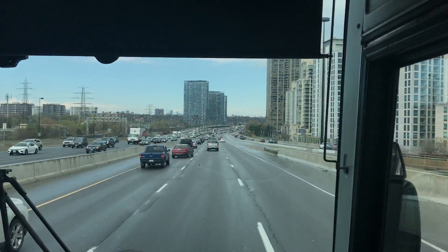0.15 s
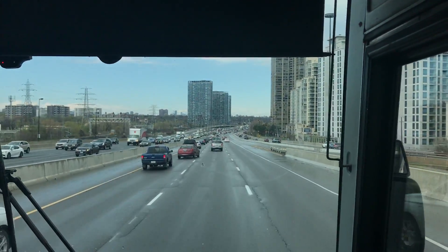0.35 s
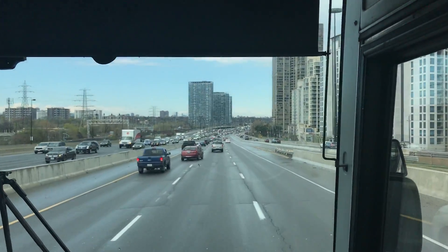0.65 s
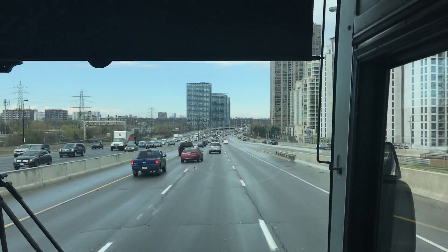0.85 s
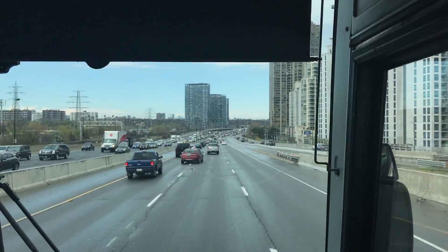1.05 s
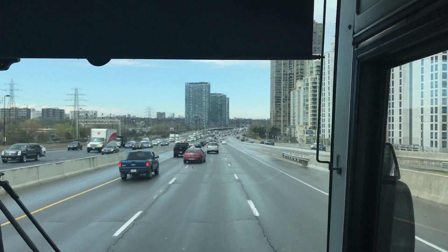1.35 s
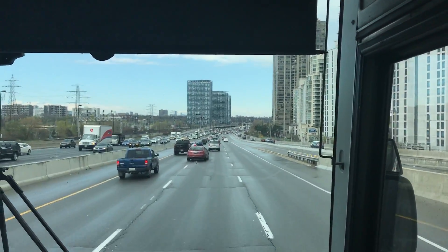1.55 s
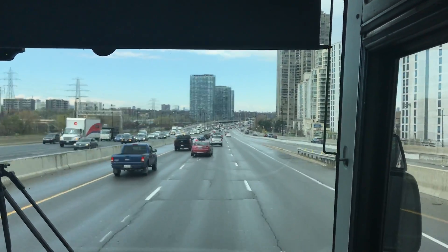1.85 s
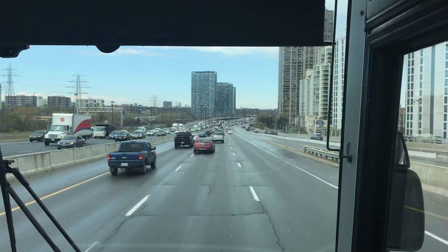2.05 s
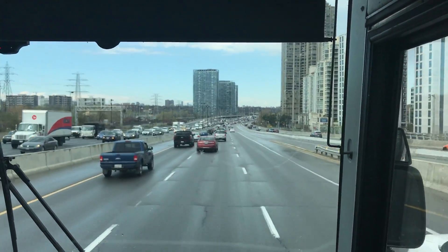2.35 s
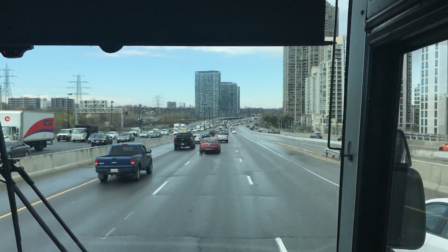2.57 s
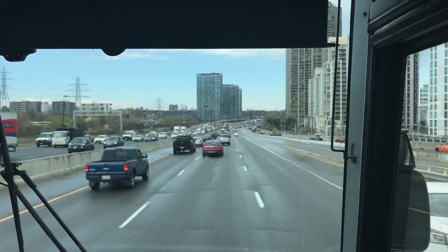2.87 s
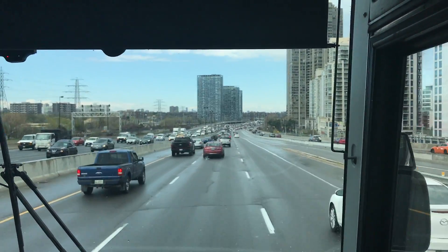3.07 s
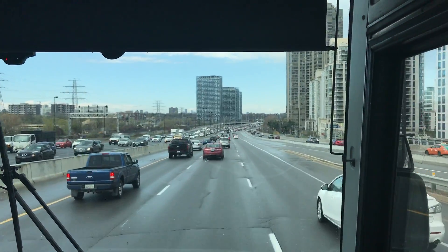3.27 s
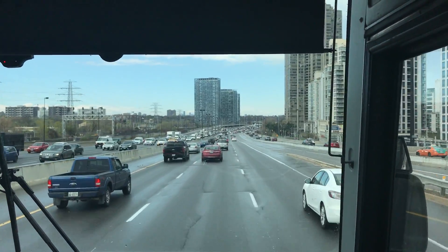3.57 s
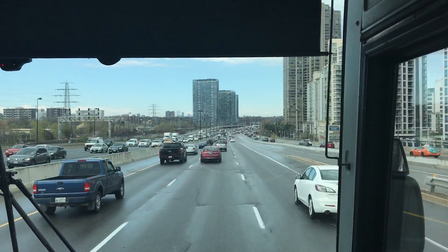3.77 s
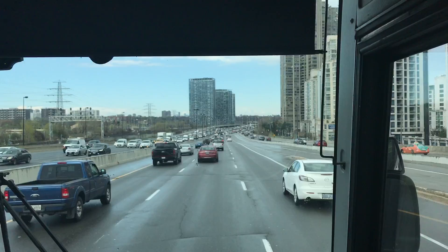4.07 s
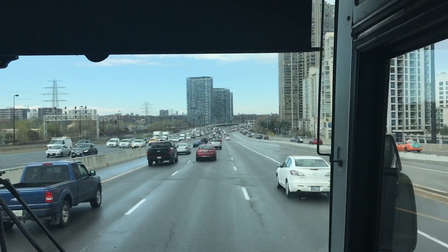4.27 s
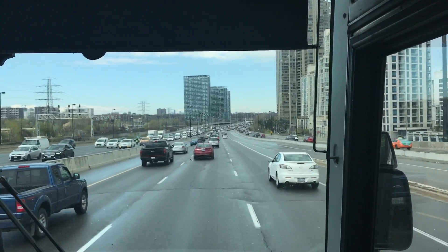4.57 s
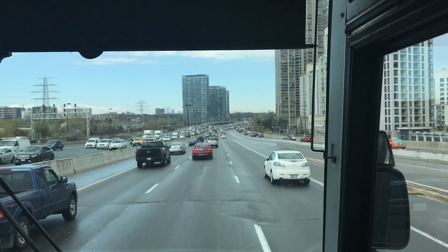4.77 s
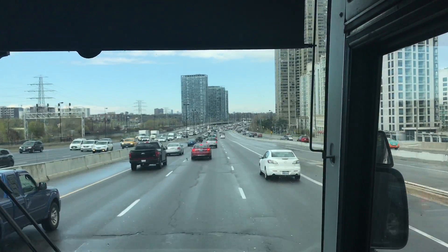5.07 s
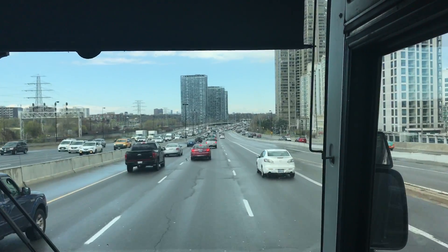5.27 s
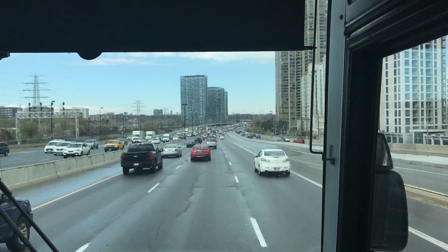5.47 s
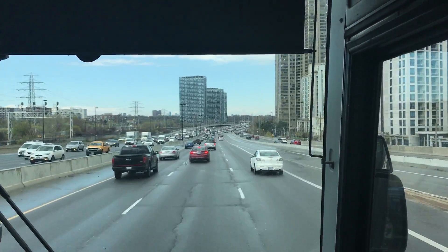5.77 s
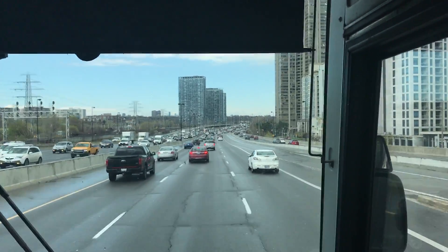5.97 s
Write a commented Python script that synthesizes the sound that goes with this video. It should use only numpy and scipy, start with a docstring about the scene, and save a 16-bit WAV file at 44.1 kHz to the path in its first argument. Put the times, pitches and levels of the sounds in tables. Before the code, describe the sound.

Inside a moving coach near the windscreen, heard through a phone microphone. A deep diesel drone wavers gently, sinking very slightly in pitch between about 2 and 3.5 seconds, beneath lumpy low cabin boom, muted tyre and wind roar and barely audible thin whines. A bump's tail opens the scene, with tiny faint chirps before 0.5. From 0.8 to 1.2 a jolt thuds and trim clatters, with dry panel knocks and piercing, very high squeaks. A second, similar flurry runs from 1.4 to 1.9. Then mostly plain rumble and light buzz, with small ticks near 2.4. At 3.0 comes a heavy deep bump with crisp knocks and a weak squeak; smaller jolts follow at 3.35 and 3.55. The ride stays smooth, with soft low swells near 4.8 and 5.4. From 5.9 a hard thud, sharp cracks, rattle and two squeaks close it, still rumbling at 6.1.

```python
"""A coach on a motorway, heard from inside, near the windscreen: its tyres and wind roar through a booming cabin.
The diesel drones in wavering sine orders beside thin whines; boom, thud and roar are shaped noise.
Boom and thud swell, strongly and faintly; trim rattles as grainy noise and panels knock as ringing bursts.
A loose fitting squeaks very high, stuttering noise ringing its modes over a short chirp.
A phone's microphone rounds the loudest peaks and cuts the extreme treble."""
import sys
import numpy as np
from scipy import signal
from scipy.fft import rfft, irfft
from scipy.io import wavfile
from scipy.ndimage import uniform_filter1d

SR = 44100
rng = np.random.default_rng(int(sys.argv[2]) if len(sys.argv) > 2 else 0)


def transcribe(u):
    """Save the signal u as a 16-bit wav file named by the first command-line argument.

    u: samples, shape (n,) or (channels, n), limited to [-1, 1]; the rate is SR.
    q: integer samples, one column per channel.
    """
    v = np.clip(np.atleast_2d(u).T, -1, 1)
    q = np.round(v * 32767).astype(np.int16)
    wavfile.write(sys.argv[1], SR, q)


N = 270333
T = np.arange(N) / SR  # s

# The diesel's course. Each row: time in seconds, pitch of the sixth order in Hz, reference level in dB.
ENGINE_COURSE = [(0, 236, -46.5), (.7, 236, -41.5), (1.4, 236, -46.5), (2.0, 234.5, -43), (2.8, 231, -44.5),
                 (3.2, 229, -55.5), (3.6, 228.3, -41.5), (4.4, 228, -42.5), (5.2, 228, -45),
                 (6.13, 228, -44)]
# Orders of the engine's turning. Each row: order [multiple], level over the reference in dB.
ENGINE_ORDERS = [(1, 4), (2, 7.5), (4, -5.5), (6, -2.5)]
# Gears and fans. Each row: mean pitch in Hz, mean level in dB.
WHINES = [(807, -63), (1210, -62.5), (3714, -76), (4258, -74), (4533, -84), (5545, -79.5)]

# Spectrum of the cabin's low boom. Each row: frequency in Hz, relative density in dB per Hz.
BOOM_SPECTRUM = [(17, -39), (27, -10), (40, -10), (55, -9.5), (78, 2), (94, -3.5), (108, -12), (135, -12),
                 (160, -26)]
# Spectrum of the body's thud. Each row: frequency in Hz, relative density in dB per Hz.
THUD_SPECTRUM = [(100, -5.5), (130, 1.5), (160, 0), (200, -10), (260, -14), (330, -20.5), (450, -21.5),
                 (560, -27.5)]
# Spectrum of the upper body modes. Each row: frequency in Hz, relative density in dB per Hz.
THUMP_SPECTRUM = [(150, -7), (200, 4), (300, -4.5), (450, -15.5), (700, -18), (1000, -28.5)]
# Spectrum of wind and tread. Each row: frequency in Hz, relative density in dB per Hz.
ROAR_SPECTRUM = [(350, -17), (450, -19), (609, -15), (692, -19), (997, -21.5), (1170, -19.5), (1440, -24.5),
                 (2500, -32.5), (4370, -37.5), (9580, -43), (15800, -51.5)]
# Peaks and dips of the cabin. Each row: centre in Hz, width in Hz, gain in dB.
CABIN_MODES = [(632, 61, 4), (1070, 90, 1.5), (4940, 230, -4.5), (7830, 1000, -4.5), (10200, 310, -1.5),
               (10520, 280, -9)]
# Swells of the low boom and thud, strong and faint.
# Each row: start in seconds, hold in seconds, boom in dB, thud in dB.
SWELLS = [(0, 0.0077, -41, -34), (0.525, 0.0083, -22, -42), (0.819, .12, -22, -28),
          (1.044, 0.076, -29.5, -40.5), (1.365, 0.033, -34, -36), (1.476, 0.079, -23.5, -34),
          (1.762, 0.037, -23.5, -29), (2.982, 0.021, -15.5, -30), (3.366, 0.0087, -18.5, -36.5),
          (3.58, 0.074, -26.5, -42), (4.774, 0.075, -27, -43), (5.387, .01, -25.5, -48),
          (5.897, 0.05, -20.5, -27), (5.985, .04, -25.5, -31.5), (6.13, .01, -23, -32)]
SWELL_RISE_DB_S, SWELL_FALL_DB_S = 267, 146
PLAIN_BOOM_DB, BOOM_LUMPS_DB = -29.5, 3  # plain road: level, and spread of its lumps
PLAIN_THUD_DB, THUD_LUMPS_DB = -38.5, 1.5
LUMPS_PER_S = 25
THUMP_EQUAL_DB, THUMP_GROWTH = -16.5, 1.36  # thump equals thud at this level; its dB per dB of thud
ROAR_DB = -47.5

# Spectrum of shaken trim. Each row: frequency in Hz, relative density in dB per Hz.
TRIM_SPECTRUM = [(350, -15.5), (500, -13), (1000, -9), (2000, -13), (4000, -25.5), (8000, -28),
                 (15800, -38.5)]
# Steady buzz of the trim, easing late on as the coach slows. Each row: time in seconds, level in dB.
TRIM_BUZZ = [(0, -54), (2.1, -50), (2.9, -53), (4.3, -56.5), (5.85, -56.5)]
# Bouts of rattling trim, strong and faint. Each row: start in seconds, hold in seconds, level in dB.
RATTLES = [(0, .01, -48), (0.863, .1, -39.5), (1.094, 0.042, -47), (1.396, 0.043, -42.5), (1.475, 0.1, -40),
           (1.625, 0.05, -44.5), (1.767, 0.033, -44.5), (1.85, 0.015, -43), (2.997, 0.014, -39),
           (3.076, 0.007, -47), (3.346, 0.025, -58), (3.548, 0.051, -48), (5.885, 0.042, -41.5),
           (5.945, 0.025, -38), (6.13, .01, -44)]
RATTLE_RISE_DB_S, RATTLE_FALL_DB_S = 284, 180

# Slips of the fitting. Each row: start in seconds, shrill peak in dB, shrill centre in Hz,
# middle modes' peak in dB, chirp peak in dB, mean chirp pitch in Hz, length in seconds.
SQUEAKS = [(.17, -67, 13800, -70, -52, 2300, .012), (0.413, -70, 13800, -70, -49, 2310, .012),
           (0.831, -30.5, 13700, -56, -41, 2330, 0.011), (0.91, -47, 13800, -58, -56, 2450, .012),
           (1.002, -48, 14300, -65, -37.5, 2455, 0.017), (1.076, -33.5, 13900, -44, -43, 2440, 0.014),
           (1.164, -34, 13900, -46, -40.5, 2430, 0.014), (1.382, -29.5, 13800, -58, -59, 2430, 0.016),
           (1.457, -28, 13500, -43, -52, 2470, 0.014), (1.619, -31.5, 13800, -41.5, -37, 2400, 0.015),
           (2.99, -40, 14000, -48, -65, 2500, .012), (5.938, -33, 13500, -56, -60, 2400, 0.024),
           (6.111, -39, 14100, -46, -42.5, 2490, 0.02)]
# The fitting's middle modes. Each row: centre in Hz, width in Hz, relative gain in dB.
MIDDLE_MODES = [(9930, 220, 0), (10600, 340, -2), (11350, 500, 3.5)]
# The fitting's high modes. Each row: centre in Hz, width in Hz, relative gain in dB.
SHRILL_MODES = [(13200, 200, -4), (13450, 200, 0), (13800, 200, -2), (14090, 220, 0), (14350, 250, 0),
                (14750, 250, -5)]
SHRILL_REACH_HZ = 900  # width of the band in which a squeak wakes the high modes
TAIL_T60_S, TAIL_DB = .13, -4

# Panels slapping together. Each row: start in seconds, peak in dB, centre in Hz,
# wideband edge against the ringing body in dB.
KNOCKS = [(.796, -51, 8000, -20), (.863, -42, 7000, -25), (.875, -34, 3960, -13), (.918, -40, 3500, -25),
          (.947, -34, 3500, -12), (.972, -40, 1600, -30), (.992, -32, 4900, -6), (1.054, -36.5, 4300, -14),
          (1.119, -36, 3930, -24), (1.377, -44.5, 3480, -25), (1.415, -44, 1750, -30),
          (1.43, -32.5, 4600, -16), (1.486, -35, 4500, -20), (1.504, -34.5, 4360, -15),
          (1.507, -38, 940, -30), (1.558, -32.5, 3780, -6), (1.575, -45, 950, -30), (1.627, -33, 4800, -14),
          (1.700, -41, 4480, -25), (1.754, -49, 9000, -12), (1.770, -47, 4000, -10),
          (1.805, -43.5, 3980, -10), (1.851, -34.5, 4740, -21), (1.865, -47, 5750, -28),
          (1.950, -41.5, 4500, -22), (2.36, -48, 4000, -4.5), (2.541, -53, 5000, -7),
          (2.992, -40, 3100, -6), (3.011, -54, 1570, -20), (3.042, -37, 4000, 9), (3.081, -37, 3100, -3),
          (3.325, -51, 9000, -5), (3.519, -42, 3500, -22), (3.55, -47, 3500, -20), (3.596, -42, 3500, -18),
          (5.866, -33.5, 2000, 2), (5.886, -31, 4000, 13), (5.919, -33, 6100, -10), (5.944, -36, 4000, -3),
          (5.970, -37, 3000, 5), (5.995, -45, 3000, -7)]
KNOCK_T60_S, WIDE_FROM_HZ = .19, 2400

CEILING, TOP_HZ = .45, 15850  # the microphone input: rounding limit [full scale], treble cut


def undb(db):
    """Decibels to amplitude."""
    return 10 ** (np.asarray(db) / 20)


def level(x, db):
    """Sets the RMS level."""
    return x * undb(db) / np.sqrt(np.mean(x ** 2))


def peak(x, db):
    """Sets the peak level."""
    return x * undb(db) / np.max(np.abs(x))


def fade(t, t60):
    """Exponential decay by 60 dB in t60 seconds."""
    return np.exp(-np.log(1000) * t / t60)


def smooth_twice(x, size):
    """Two running means, one after the other."""
    return uniform_filter1d(uniform_filter1d(x, size), size)


def even(x, s):
    """Divides out level swings slower than about s seconds, leaving RMS near 1."""
    return x / np.sqrt(smooth_twice(x ** 2, int(s * SR)))


def walk(rate):
    """Random levels held 1 / rate s and slewed twice; spread near 1."""
    hold = int(SR / rate)
    steps = np.repeat(rng.standard_normal(N // hold + 1), hold)
    return 1.3 * smooth_twice(steps, hold)[:N]


def colour(x, points, modes=()):
    """Weights x by a spectrum and bell-shaped peaks or dips; all but silent outside the spectrum."""
    hz = np.fft.rfftfreq(len(x), 1 / SR) + 1e-3  # keeps the logarithm finite at zero
    point_hz, point_db = np.transpose(points)
    db = np.interp(np.log(hz), np.log(point_hz), point_db, -120, -120)
    for centre, width, gain in modes:
        db = db + gain * np.exp(-.5 * ((hz - centre) / width * 2) ** 2)
    return irfft(rfft(x) * undb(db), len(x))


def ring(x, hz, width_hz):
    """One resonance, gain 1 at its centre."""
    b, a = signal.iirpeak(hz, hz / width_hz, SR)
    return signal.lfilter(b, a, x)


def add(out, s, x):
    """Mixes x in from s seconds, cut at the end."""
    i = int(s * SR)
    out[i:i + len(x)] += x[:N - i]


def bouts(steady_db, starts, holds, peaks_db, rise, fall):
    """Adds the power of bouts to a steady level: each climbs, holds and dies away (dB per s)."""
    power = undb(2 * steady_db)
    for s, hold, db in zip(starts, holds, peaks_db):
        before = np.maximum(s - T, 0)
        after = np.maximum(T - s - hold, 0)
        power = power + undb(2 * (db - rise * before - fall * after))
    return 10 * np.log10(power)


def engine(sixth_hz, db):
    """Engine orders that waver with load, and thin gear and fan whines, all as sines."""
    turn = 2 * np.pi * np.cumsum(sixth_hz / 6) / SR
    out = np.zeros(N)
    for order, gain in ENGINE_ORDERS:
        strength = undb(db + gain + 2.2 * walk(8))
        out += strength * np.sin(int(order) * turn + .4 * walk(6))
    for hz, whine_db in WHINES:
        strength = undb(whine_db + 2 * walk(5.08))
        out += strength * np.sin(2 * np.pi * np.cumsum(hz * (1 + .003 * walk(3))) / SR)
    return np.sqrt(2) * out  # the levels are RMS


def road(boom_db, thud_db):
    """Tyres shake the floor into cabin boom and body thud; wind and tread roar with a slight flutter."""
    boom = undb(boom_db) * even(colour(rng.standard_normal(N), BOOM_SPECTRUM), .1)
    thud = undb(thud_db) * even(colour(rng.standard_normal(N), THUD_SPECTRUM), .12)
    # hard thuds wake the upper body modes more than in proportion
    thump_db = thud_db + (THUMP_GROWTH - 1) * (thud_db - THUMP_EQUAL_DB)
    thump = undb(thump_db) * even(colour(rng.standard_normal(N), THUMP_SPECTRUM), .01)
    flutter = undb(.33 * walk(1.76) + .96 * walk(14))
    roar = colour(flutter * rng.standard_normal(N), ROAR_SPECTRUM, CABIN_MODES)
    return boom + thud + thump + level(roar, ROAR_DB)


def shaken_trim(trim_db):
    """Dense small impacts all over the trim, as noise with a fast uneven level."""
    grains = rng.standard_normal(N) * undb(2.4 * walk(70))
    return undb(trim_db) * even(colour(grains, TRIM_SPECTRUM, CABIN_MODES), .084)


def squeaks():
    """A stuttering slip rings the fitting and chirps with its octave; the cabin draws each one out."""
    near, t = np.zeros(N), T[:SR // 10]
    chance = rng.standard_normal((len(SQUEAKS), 3, len(t)))
    for row, (rub, size, drift) in zip(SQUEAKS, chance):
        s, shrill_db, shrill_hz, middle_db, chirp_db, chirp_hz, length = row
        shape = np.exp(-(t / length) ** 2)
        slip = rub * undb(29 * uniform_filter1d(size, size=60)) * shape  # stutters within about 1.4 ms
        band = ring(slip, shrill_hz, SHRILL_REACH_HZ)
        shrill = sum(undb(g) * ring(band, f, w) for f, w, g in SHRILL_MODES)
        middle = sum(undb(g) * ring(ring(slip, f, w), f, w) for f, w, g in MIDDLE_MODES)
        pitch = chirp_hz * (1 + .15 * uniform_filter1d(drift, size=200))
        phase = 2 * np.pi * np.cumsum(pitch) / SR
        chirp = np.sin(phase) + undb(-13) * np.sin(2 * phase)
        chirp = chirp * shape * (1 - fade(t, .03)) * undb(24 * uniform_filter1d(size, size=150))
        add(near, s, peak(shrill, shrill_db) + peak(middle, middle_db) + peak(chirp, chirp_db))
    t = T[:SR // 3]
    echoes = rng.standard_normal(len(t)) * fade(t, TAIL_T60_S)
    echoes = echoes / np.sqrt(np.sum(echoes ** 2))
    return near + undb(TAIL_DB) * signal.fftconvolve(near, echoes)[:N]


def knocks():
    """Panels slap together: a crack, then a noisy tail around each panel's own colour."""
    out, t = np.zeros(N), T[:SR // 4]
    envelope = (1 - fade(t, .01)) * (.48 * fade(t, .031) + fade(t, KNOCK_T60_S))
    chance = rng.standard_normal((len(KNOCKS), len(t)))
    for (s, db, hz, edge_db), noise in zip(KNOCKS, chance):
        width = hz * min(hz / WIDE_FROM_HZ, 1) * 1.22  # low panels ring more clearly
        body = level(ring(ring(noise, hz, width), hz, width), 0)
        add(out, s, peak((body + level(noise, edge_db)) * envelope, db))
    return out


def scene():
    """Sets the course of engine, road and trim, and mixes every source in the cabin."""
    times, course_hz, course_db = np.transpose(ENGINE_COURSE)
    sixth_hz = np.interp(T, times, course_hz)
    drone_db = np.interp(T, times, course_db)
    starts, holds, boom_peaks, thud_peaks = np.transpose(SWELLS)
    lumps = walk(LUMPS_PER_S)  # the road surface is never even,
    lumps = lumps - uniform_filter1d(lumps, size=SR // 6)  # but its lumps average out
    plain_boom = PLAIN_BOOM_DB + BOOM_LUMPS_DB * lumps
    plain_thud = PLAIN_THUD_DB + THUD_LUMPS_DB * lumps
    boom_db = bouts(plain_boom, starts, holds, boom_peaks, SWELL_RISE_DB_S, SWELL_FALL_DB_S)
    thud_db = bouts(plain_thud, starts, holds, thud_peaks, SWELL_RISE_DB_S, SWELL_FALL_DB_S)
    buzz_db = np.interp(T, *np.transpose(TRIM_BUZZ))
    trim_db = bouts(buzz_db, *np.transpose(RATTLES), RATTLE_RISE_DB_S, RATTLE_FALL_DB_S)
    vehicle = engine(sixth_hz, drone_db) + road(boom_db, thud_db)
    loose_parts = shaken_trim(trim_db) + knocks() + squeaks()
    return (vehicle + loose_parts)[None]


def record(dry):
    """The phone's microphone input rounds the loudest peaks and cuts the top."""
    rounded = CEILING * np.tanh(dry / CEILING)
    treble_cut = signal.ellip(12, .2, 80, TOP_HZ, fs=SR, output="sos")
    return signal.sosfilt(treble_cut, rounded)


dry = scene()
out = record(dry)
transcribe(out)
```